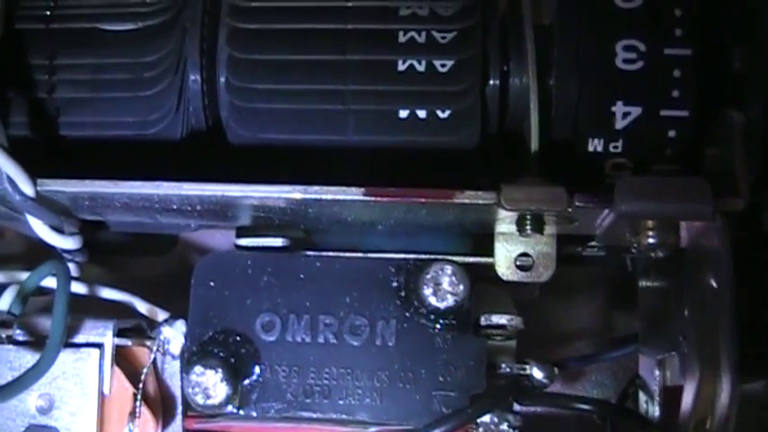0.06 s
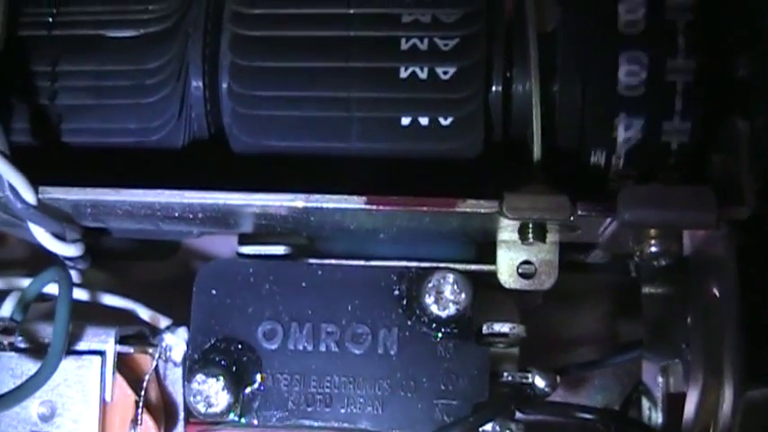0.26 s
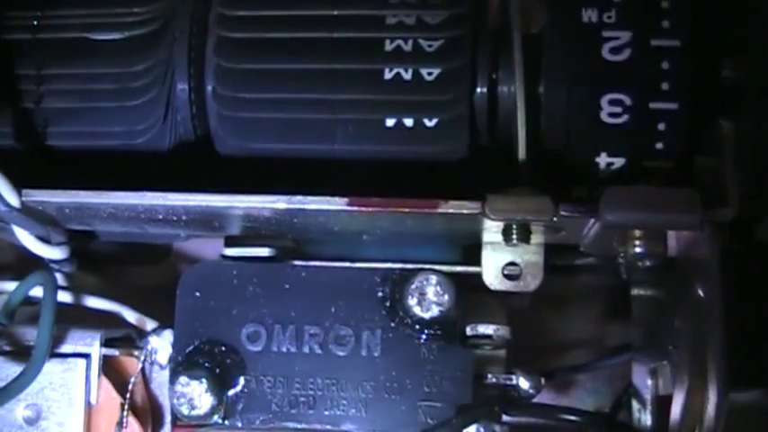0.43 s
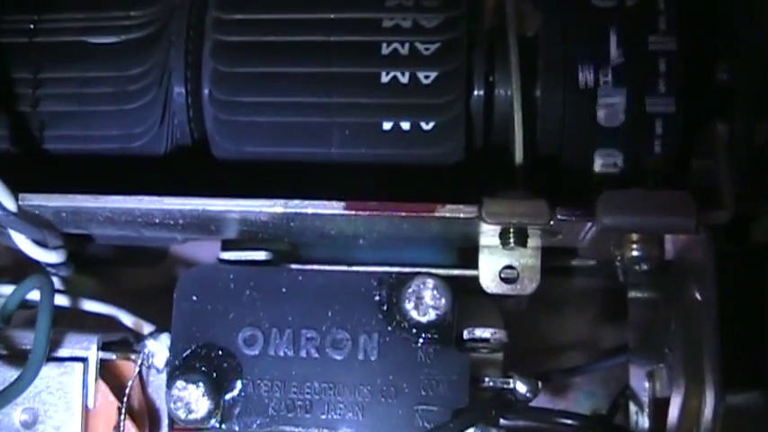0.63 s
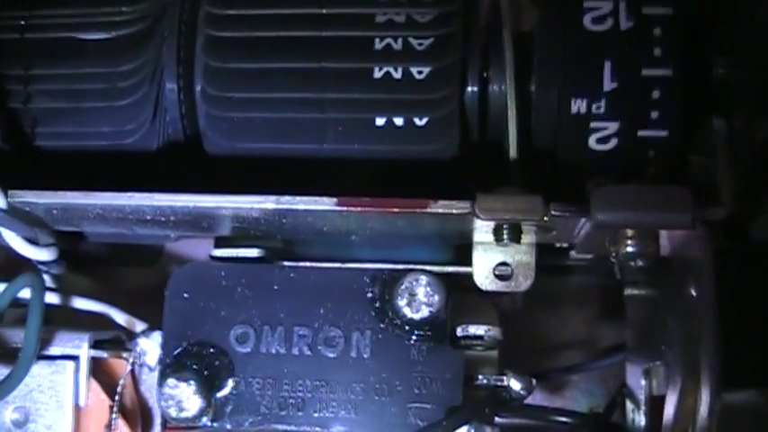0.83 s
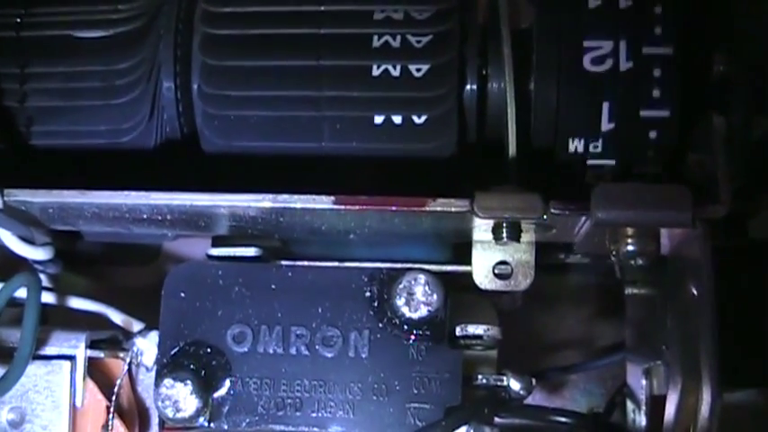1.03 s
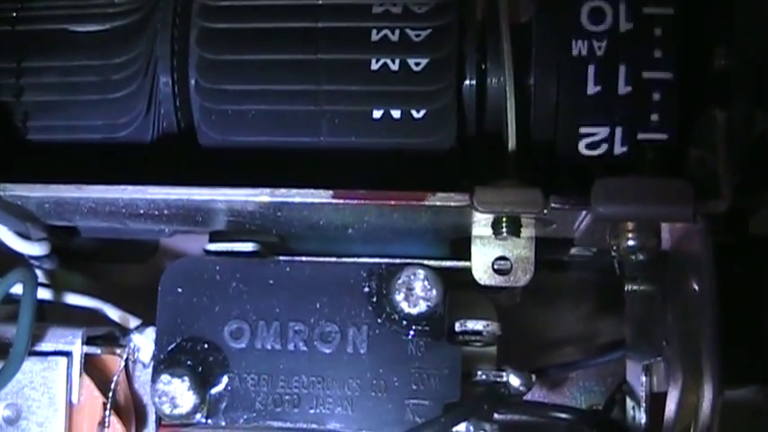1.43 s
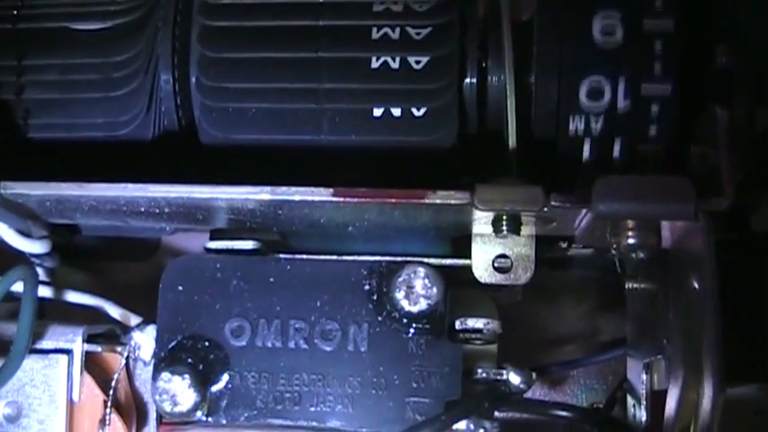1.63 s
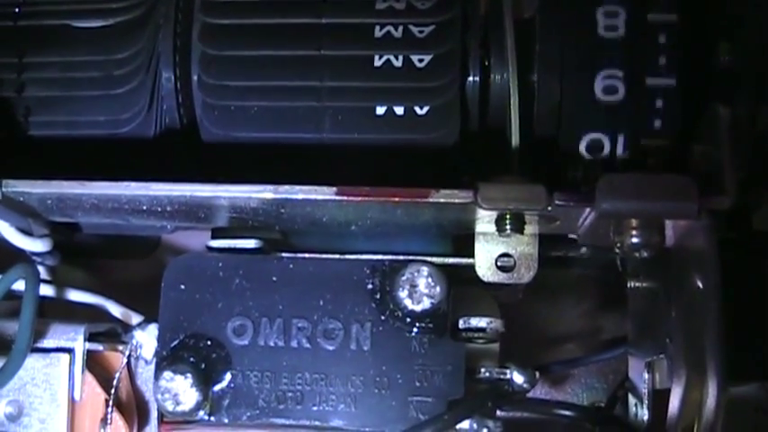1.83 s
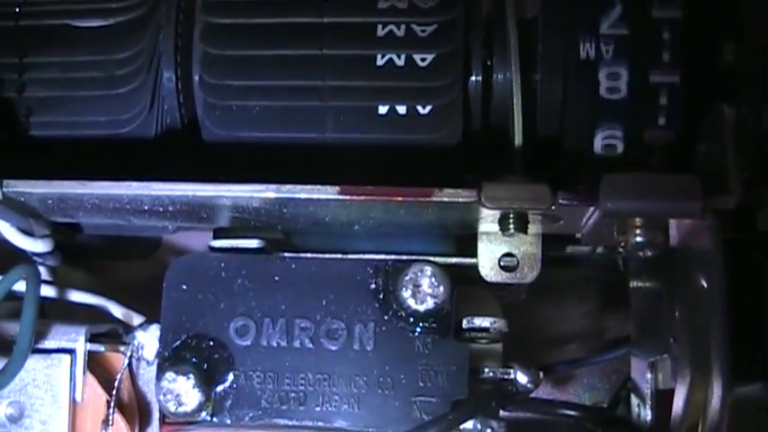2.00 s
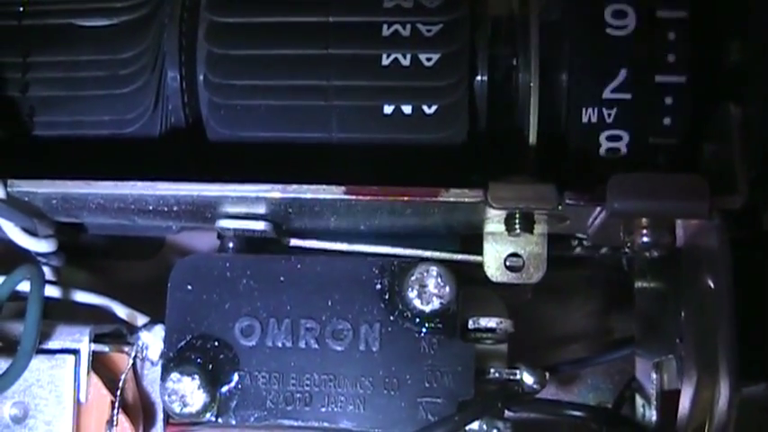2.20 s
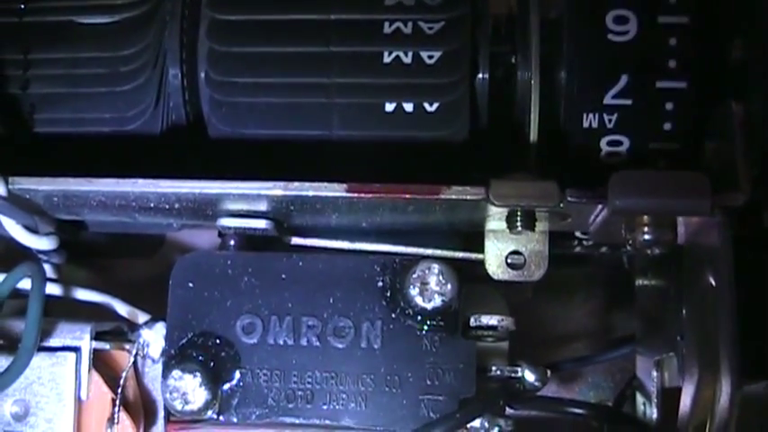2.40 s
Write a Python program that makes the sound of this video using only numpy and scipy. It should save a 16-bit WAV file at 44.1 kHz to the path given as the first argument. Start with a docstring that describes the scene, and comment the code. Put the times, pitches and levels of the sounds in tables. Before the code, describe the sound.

Dry ratcheting clicks of a clock's number wheel turned by hand, ending in a switch snap.

```python
"""Dry clicks, singly and in quick pairs, close to the microphone and slightly to the right: the number
wheel of a drum clock is turned by hand and a springy pawl drops over its teeth. Near the end a lever
slides off its cam and a microswitch snaps and rings. Under it lie a low handling rumble and the soft
hiss and faint whine of a small, quiet room. The recorder's automatic gain turns the background down
during the clicks, then lets it recover."""
import sys
import numpy as np
from scipy import signal
from scipy.fft import rfft, irfft, next_fast_len
from scipy.io import wavfile

SR = 44100
rng = np.random.default_rng(int(sys.argv[2]) if len(sys.argv) > 2 else 0)


def log_audio(samples):
    """Write samples as a 16-bit WAV file to the path given in sys.argv[1]."""
    # one column per channel
    frames = np.atleast_2d(samples).T
    # limit to full scale, then quantise
    limited = np.clip(frames, -1, 1)
    pcm = np.round(limited * 32767).astype(np.int16)
    wavfile.write(sys.argv[1], SR, pcm)


N = 112454
HIT = 14336  # samples in one short sound
T = np.arange(HIT) / SR


def amp(db):
    """Decibels to gain."""
    return 10 ** (np.asarray(db) / 20)


def unit(x):
    """x at rms 1."""
    return x / np.sqrt(np.mean(x ** 2) + 1e-20)


def at_hz(points, hz):
    """Read (freq_hz, value) points on a log frequency axis."""
    return np.interp(np.log(hz + 1), np.log(np.array(points)[:, 0] + 1), np.array(points)[:, 1])


def at_time(points, s):
    """Read (time_s, value) points."""
    return np.interp(s, *np.transpose(points))


def fade(t, t60_s):
    """Decay by 60 dB in t60_s."""
    return np.exp(-np.log(1000) * t / t60_s)


def pan(db):
    """Channel gains, the left db above the right."""
    return amp(np.array([[db], [-db]]) / 2)


def noise(size, width):
    """White stereo noise; width is side over mid."""
    mid, side = rng.standard_normal((2, size))
    return unit(np.array([mid + width * side, mid - width * side]))


def filtered(x, response):
    """x times a complex response of frequency."""
    n = x.shape[-1]
    padded = next_fast_len(n + HIT)
    return irfft(rfft(x, padded) * response(np.fft.rfftfreq(padded, 1 / SR)), padded)[..., :n]


def coloured(x, points):
    """A short sound through a minimum-phase filter of energy 1."""
    gain = amp(at_hz(points, np.fft.rfftfreq(HIT, 1 / SR)))
    cepstrum = irfft(np.log(gain))
    cepstrum[1:HIT // 2] *= 2
    cepstrum[HIT // 2 + 1:] = 0
    pulse = irfft(np.exp(rfft(cepstrum)))
    return signal.fftconvolve(x, pulse[None] / np.linalg.norm(pulse), axes=1)[:, :HIT]


def ring(modes, rise_s=0.00023, detune=0.003, scatter_db=1.5):
    """Damped modes, a little different in level and pitch at every blow."""
    chance = rng.standard_normal((len(modes), 2))
    out = np.zeros((2, HIT))
    for (hz, db, t60_s, pan_db), (louder, sharper) in zip(modes, chance):
        tone = np.sin(2 * np.pi * hz * (1 + detune * sharper) * T + rng.uniform(0, 2 * np.pi))
        out += pan(pan_db) * amp(db + scatter_db * louder) * fade(T, t60_s) * tone
    return out * (1 - np.exp(-T / rise_s))


# Soft hiss, wide around the microphone: freq_hz, gain_db
HISS_COLOUR = [(100, 5.5), (800, 0), (1600, -5.5), (2300, -8.5), (3500, -9.5), (6000, -17), (9000, -17.5),
               (15000, -32.5)]
# Faint whine in the room: pitch_hz, width_hz, level_db
WHINE_LINES = [(779, 16, -70), (1050, 13, -71), (1960, 17.4, -63.5), (2100, 90, -69.5), (2400, 38, -72),
               (7553, 80, -78)]
# The recorder's automatic gain on both: time_s, gain_db
AUTO_GAIN = [(0, 1.5), (.25, 5), (.85, -1.5), (1.7, -5.5), (2.3, -4), (2.55, 1)]


def hiss_and_whine():
    """Broad noise and narrow steady bands; the gain curve dips during the clicks, then recovers."""
    hiss = unit(filtered(noise(N, width=0.9), lambda hz: amp(at_hz(HISS_COLOUR, hz))))
    whine = np.zeros((2, N))
    for pitch_hz, width_hz, db in WHINE_LINES:
        band = filtered(noise(N, width=0.34), lambda hz: 1 / (1 + (2 * (hz - pitch_hz) / width_hz) ** 2))
        whine += amp(db) * unit(band)
    return amp(at_time(AUTO_GAIN, np.arange(N) / SR)) * (amp(-56.5) * hiss + whine)


# Handling rumble at the microphone: freq_hz, gain_db
HANDLING_COLOUR = [(20, -25), (50, -12), (82, 1.5), (110, -7.5), (165, -1), (240, -8.5), (340, -13),
                   (600, -24.5), (1200, -29.5), (3000, -60)]
# Its level, with the hand's force and the automatic gain's dip: time_s, gain_db
HANDLING_LEVEL = [(0.0, -50), (0.16, -43), (0.31, -48.5), (0.98, -53.5), (1.53, -56), (1.75, -56.5),
                  (1.91, -58), (2.35, -52), (2.55, -47.5)]


def handling_rumble():
    """Low handling rumble, strongest as the wheel is first pushed."""
    rumble = unit(filtered(noise(N, width=0.089), lambda hz: amp(at_hz(HANDLING_COLOUR, hz))))
    return amp(at_time(HANDLING_LEVEL, np.arange(N) / SR) + 2) * rumble


# How fast the small room dies away: freq_hz, t60_s
ROOM_DECAY = [(200, 0.33), (2000, 0.18), (8000, 0.12), (15000, .1)]
# Its reflections as they reach the microphone: freq_hz, gain_db
ROOM_COLOUR = [(500, 3.5), (2000, -1), (5000, -5), (8500, -1), (11000, -3.5), (13000, -6.5), (16000, -8)]


def play_in_room(out, start_s, sound, room_db=-19, delay_s=0.0074):
    """Add a close sound to out, with the room's short, weak tail just behind it."""
    hz, t, spectra = signal.stft(noise(HIT, width=0.63), SR, nperseg=256)
    tail = signal.istft(spectra * fade(t, at_hz(ROOM_DECAY, hz)[:, None]), SR, nperseg=256)[1]
    wet = amp(room_db) * signal.fftconvolve(sound, tail / np.linalg.norm(tail[0]), axes=1)
    wet = filtered(wet, lambda hz: amp(at_hz(ROOM_COLOUR, hz)))
    for s, part in ((start_s, sound), (start_s + delay_s, wet)):
        span = out[:, int(round(s * SR)):][:, :part.shape[1]]
        span += part[:, :span.shape[1]]


# The lever's scrape, close and wide: freq_hz, gain_db
SCRAPE_COLOUR = [(200, -27), (1000, -23), (2500, -13), (4500, -15), (7300, -8), (11000, -3), (14000, -4),
                 (15500, -11), (16800, -21)]


def lever(start_s=2.121, slide_s=0.004):
    """The lever scrapes off its cam just before the switch snaps."""
    out = np.zeros((2, N))
    scrape = noise(HIT, width=1.0) * fade(np.maximum(T - slide_s, 0), t60_s=0.025)
    play_in_room(out, start_s, amp(-12) * coloured(scrape, SCRAPE_COLOUR))
    return out


# The switch's snap and bounces, close up: start_s, level_db
SNAPS = [(2.1248, 2.5), (2.132, -20.5), (2.138, -13.5), (2.145, -19)]
# Its bright contact: freq_hz, gain_db
SNAP_COLOUR = [(150, -24), (500, -6), (800, -2.5), (1800, -3), (2800, 0), (4500, 0), (7300, 7),
               (11000, 1.5), (14000, -11.5), (16500, -28.5)]
# The dead thump of its case: freq_hz, gain_db
THUMP_COLOUR = [(150, -22.5), (350, -27.5), (550, -29.5), (750, -9.5), (1100, -14), (1500, -2), (1850, 5),
                (2250, -5.5), (3200, -5.5), (5000, -35), (12000, -43)]
# Case and spring ringing, to the right: pitch_hz, level_db, t60_s, left_minus_right_db
SWITCH_MODES = [(798, -57.5, 0.618, -4), (1845, -28, .025, -1.5), (2480, -26, 0.027, -1),
                (3430, -20, 0.017, -1), (3680, -38.5, .05, -13), (4506, -39.5, 0.11, -8),
                (7250, -25, 0.092, -3), (8425, -30, 0.058, -4), (9022, -29.5, .06, -1),
                (10730, -18, 0.044, -2), (11510, -24.5, 0.084, -9), (13200, -22.5, 0.099, -2)]


def microswitch():
    """The switch snaps over with a thump; its contact bounces, ringing case and spring each time."""
    out = np.zeros((2, N))
    blow = np.array([T == 0, T == 0], float)
    play_in_room(out, SNAPS[0][0], amp(6.5) * coloured(blow, THUMP_COLOUR))
    for start_s, db in SNAPS:
        contact = amp(-17.5) * noise(HIT, width=0.26) * fade(T, t60_s=0.062) + amp(0.5) * blow
        play_in_room(out, start_s, amp(db) * (coloured(contact, SNAP_COLOUR) + ring(SWITCH_MODES)))
    return out


# The clock's housing, heard close: freq_hz, gain_db
KNOCK_COLOUR = [(80, -4), (250, 2.5), (450, 1.5), (750, 1), (1100, -3), (2000, -10), (6000, -39.5)]
# Knock against click, strongest while the wheel is first pushed: time_s, gain_db
KNOCK_LEVEL = [(.24, -14), (.45, -12), (.62, -18.5), (1, -24), (2.26, -31.5)]
CONTACT_PAN_DB = -4.5  # knock and pawl strike sit right of centre


def housing_knock(start_s):
    """The pawl's blow gives the housing a short, dull knock."""
    push = noise(HIT, width=0.82) * fade(T, t60_s=0.0073)
    return pan(CONTACT_PAN_DB) * amp(at_time(KNOCK_LEVEL, start_s)) * coloured(push, KNOCK_COLOUR)


# Hard contact of pawl and tooth, close up: freq_hz, gain_db
CLICK_COLOUR = [(150, -46), (700, -30), (1300, -20.5), (3500, -17.5), (6200, -11), (8200, -3), (9600, -1.5),
                (11800, -6.5), (12700, -16), (13700, 2.5), (14800, -8.5), (15600, -15), (16800, -19.5)]
# Pawl and wheel ringing: pitch_hz, level_db, t60_s, left_minus_right_db
PAWL_MODES = [(1299, -26.5, 0.036, 0), (1991, -22.5, 0.032, 1), (2257, -16, 0.02, 0), (3020, -31, 0.026, 1),
              (3550, -30, 0.042, 2), (4300, -17.5, 0.026, -1.5), (4690, -7, 0.02, -0.5),
              (5420, -23, 0.032, -13.5), (7793, -3, 0.018, -1.5), (8575, 2, 0.015, -2),
              (8740, -10.5, 0.023, -1), (10105, -6, 0.015, -7.5), (10853, -0.5, 0.017, 8),
              (11980, -4, .014, -8.5), (12200, -16, 0.017, -2.5), (14220, -4.5, 0.01, 2)]


def pawl_click(body_db, body_hz=6500, strike_db=16, rebound_s=0.0007):
    """The pawl strikes a tooth, rebounds once and rings; body_db weights the sound below body_hz."""
    contact = amp(1) * noise(HIT, width=0.3) * fade(T, t60_s=0.016)
    contact[:, 0] += amp(strike_db)
    contact[:, int(rebound_s * SR * rng.uniform(0.9, 1.1))] += amp(strike_db - 6)
    click = pan(CONTACT_PAN_DB) * coloured(contact, CLICK_COLOUR) + amp(4.5) * ring(PAWL_MODES)
    click = filtered(click, lambda hz: amp(body_db / (1 + (hz / body_hz) ** 4)))
    attack_rms = np.sqrt(np.mean(click[:, T < 0.006] ** 2))
    return click / attack_rms


def lead_in_swell(length_s):
    """A very brief swell of noise leading into each click."""
    return coloured(noise(HIT, width=0.22) * np.where(T < length_s, T / length_s, 0), CLICK_COLOUR)


# Pawl drops, close to the microphone: start_s, level_db, body_db
CLICKS = [(0.0676, -42, 19), (0.239, -12, 3), (0.2582, -13.5, -1.5), (0.2925, -15.5, 2), (0.3088, -14, 1),
          (0.4431, -13, 4.5), (0.4609, -14, -2.3), (0.5054, -13.5, -1), (0.5344, -15.5, -1.5),
          (0.585, -14.5, 0.1), (0.6039, -15.5, -2), (0.6299, -16, -3), (0.7112, -14, -3.5),
          (0.73, -16.0, -4), (0.8273, -15.5, -4), (0.9376, -16, -3.5), (0.9495, -16.5, -3.5),
          (0.9782, -17, -2.5), (1.0212, -16, -4.3), (1.0645, -17.5, -2.5), (1.1214, -17.1, -5.5),
          (1.161, -18, -3), (1.2046, -17.5, -3.5), (1.2517, -17.5, -3.5), (1.2984, -17.5, -2.5),
          (1.3341, -17.5, -4), (1.371, -17, -2.5), (1.4287, -17.5, -3.5), (1.4429, -18.0, -2.7),
          (1.4808, -17.5, -2.5), (1.4982, -17.5, -5), (1.5395, -17.5, -5.7), (1.555, -19, -1),
          (1.5813, -19.5, -4.5), (1.6083, -19, -2), (1.6484, -18.5, -3), (1.6936, -20, 1),
          (1.7098, -20.5, -2.5), (1.7507, -19.5, 0), (1.7679, -20, -1.5), (1.8226, -20.5, 0.5),
          (1.8356, -19.5, -0.3), (1.8715, -19.5, -2), (1.898, -19.5, -1.7), (1.9501, -18.5, 0.6),
          (1.9666, -19.5, -1.5), (2.003, -17.5, -3.8), (2.0188, -19, -2.5), (2.0778, -18, 0.5),
          (2.1116, -17.5, 0), (2.2646, -18, 0.5)]
# The lever's lower ring as it settles with the last click: pitch_hz, level_db, t60_s, left_minus_right_db
SETTLE_MODES = [(1080, -38.5, 0.022, 3), (1880, -39.5, 0.066, -5), (5480, -26, 0.017, 0)]


def number_wheel(swell_s=0.003):
    """Each tooth gives a click and a knock; the lever settles with a lower ring on the last one."""
    out = np.zeros((2, N))
    play_in_room(out, CLICKS[-1][0], ring(SETTLE_MODES))
    for start_s, db, body_db in CLICKS:
        drop = amp(1) * pawl_click(body_db) + housing_knock(start_s)
        play_in_room(out, start_s, amp(db) * drop)
        play_in_room(out, start_s - swell_s, amp(db - 12.5) * lead_in_swell(swell_s))
    return out


def scene():
    """The clock, close up over the background, reaches the microphone's right channel first."""
    right_lead_s = 0.000017
    advance_s = np.array([[-0.5], [0.5]]) * right_lead_s
    clock = number_wheel() + lever() + microswitch()
    clock = filtered(clock, lambda hz: np.exp(2j * np.pi * hz * advance_s))
    return clock + pan(-1) * (handling_rumble() + hiss_and_whine())


def record(dry):
    """The recorder clips at full scale and keeps nothing above its band limit."""
    top_hz = 16500
    return filtered(np.clip(dry, -1, 1), lambda hz: 1 / np.sqrt(1 + (hz / top_hz) ** 160))


dry = scene()
out = record(dry)
log_audio(out)
```